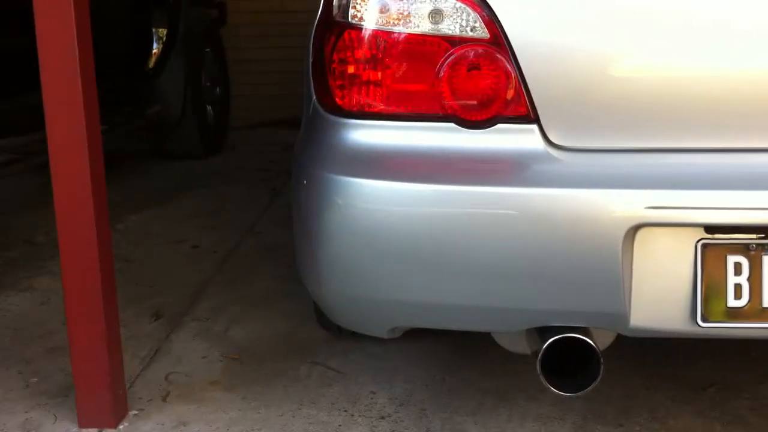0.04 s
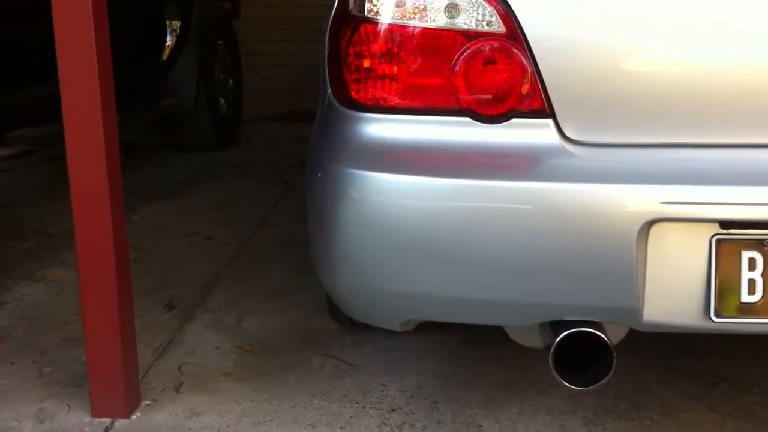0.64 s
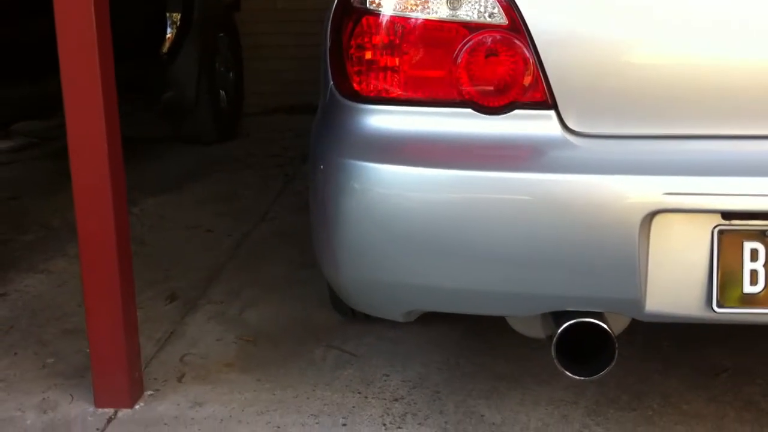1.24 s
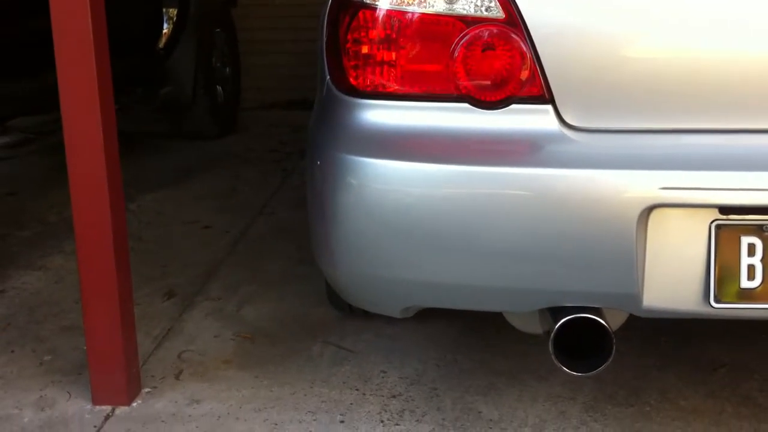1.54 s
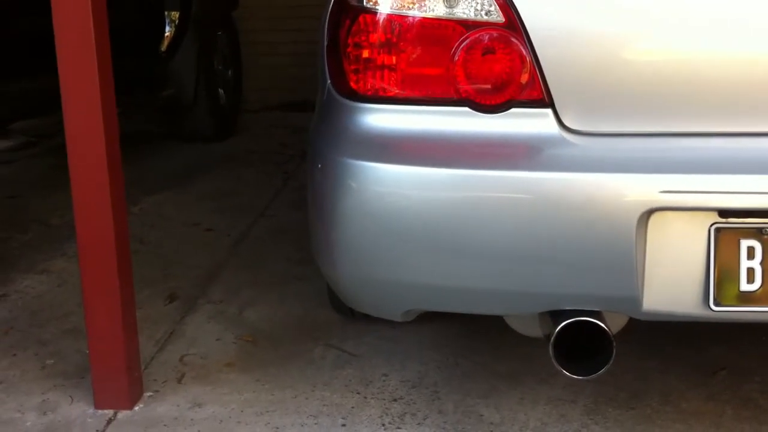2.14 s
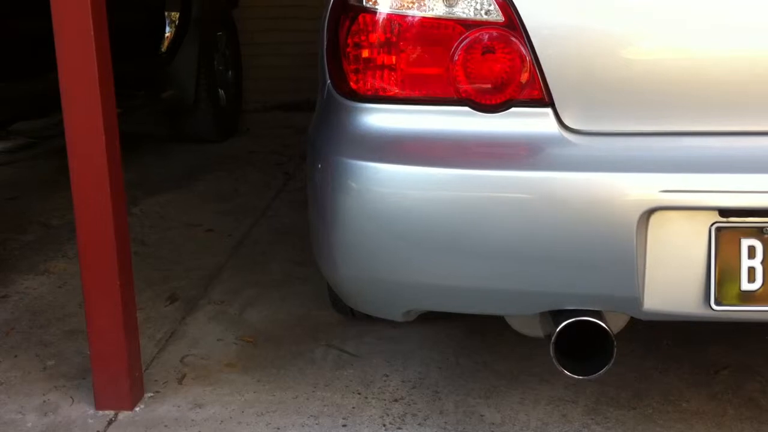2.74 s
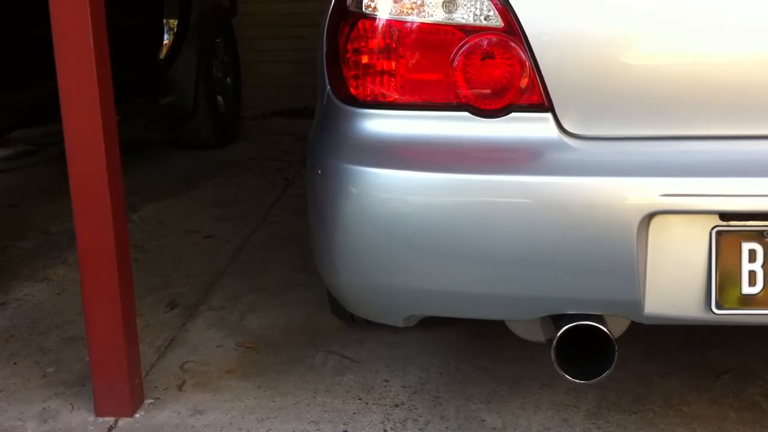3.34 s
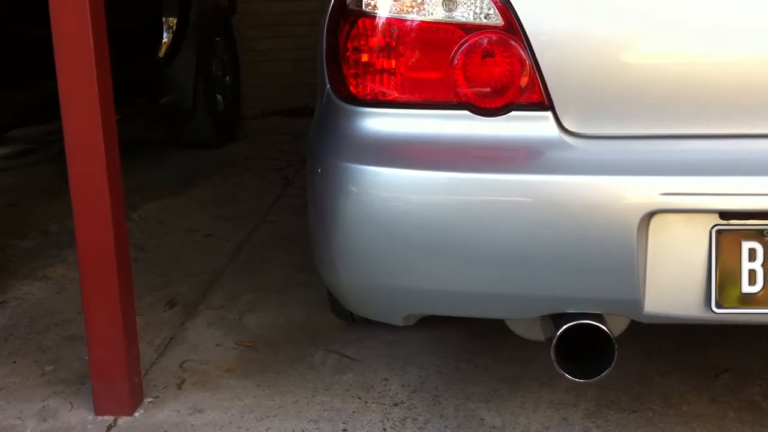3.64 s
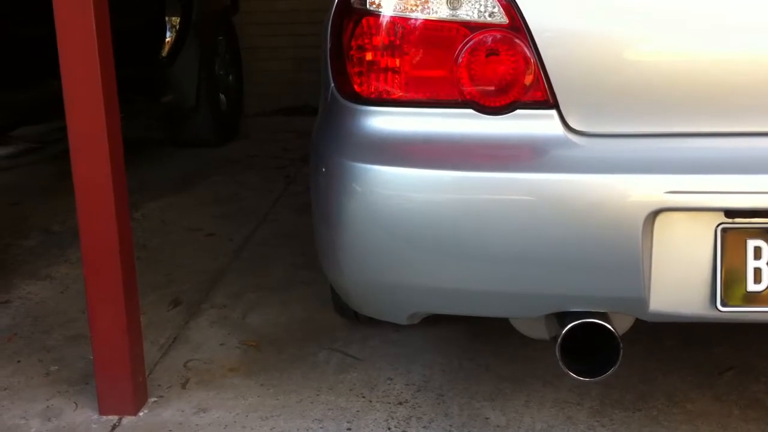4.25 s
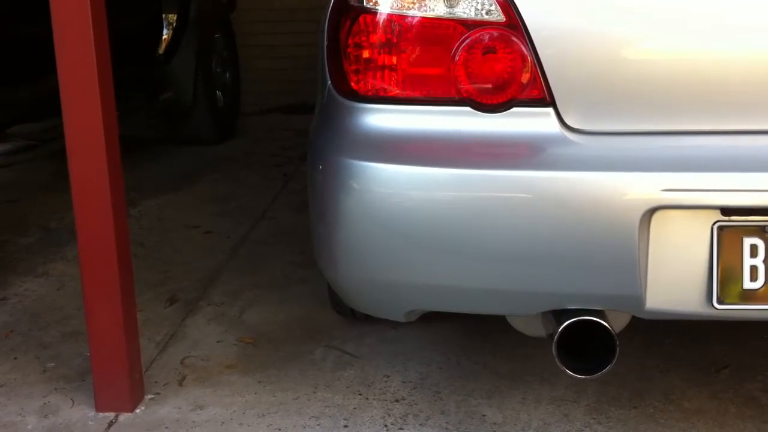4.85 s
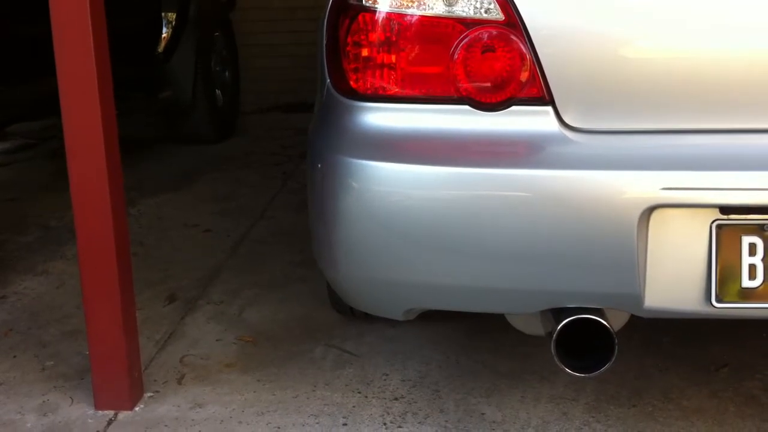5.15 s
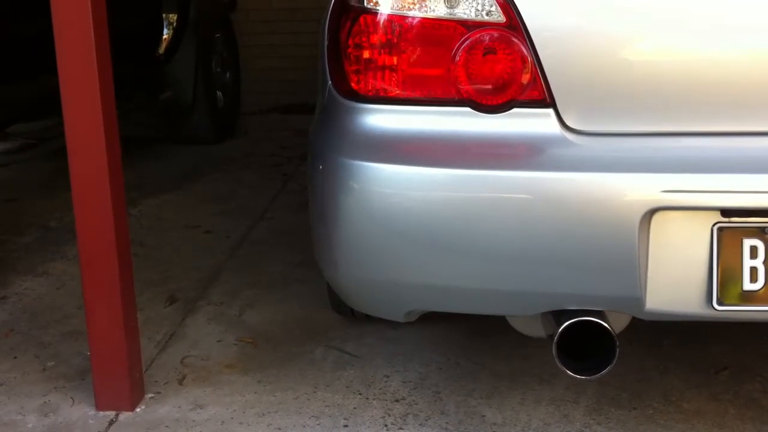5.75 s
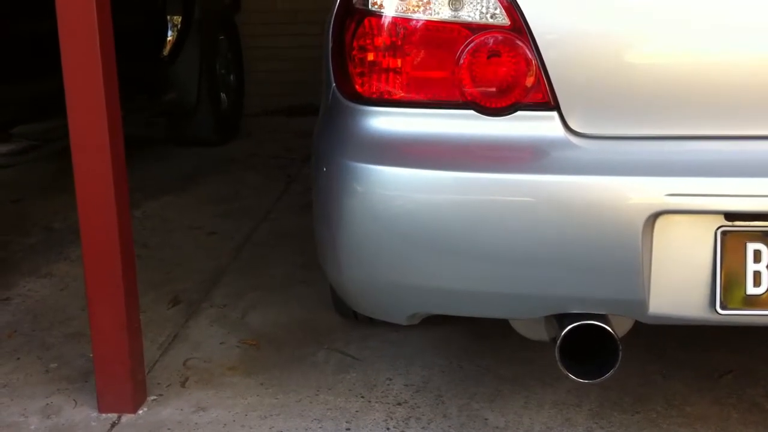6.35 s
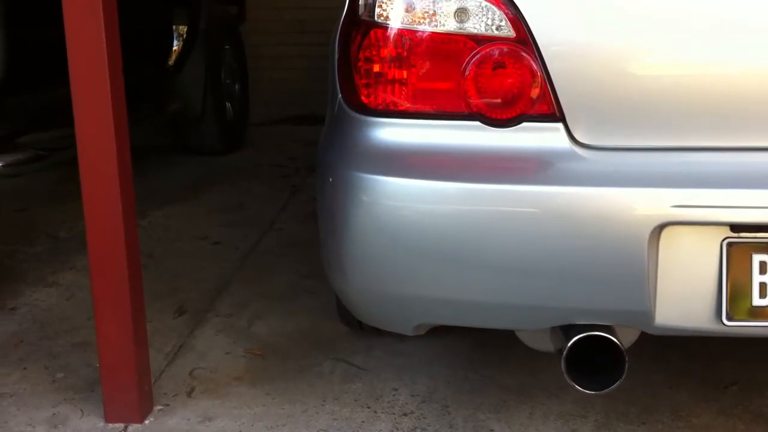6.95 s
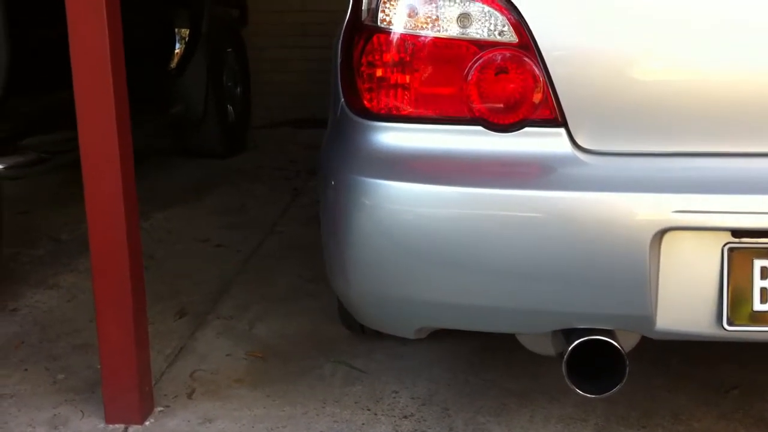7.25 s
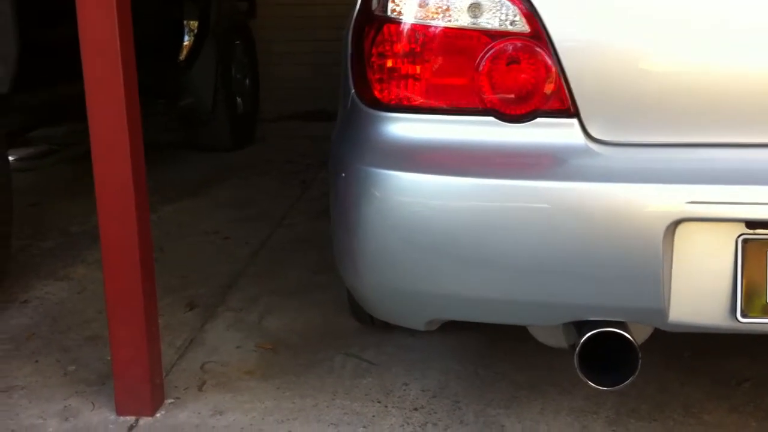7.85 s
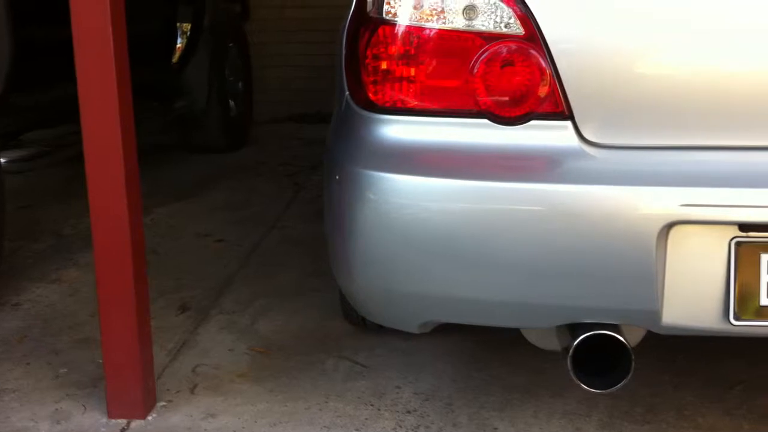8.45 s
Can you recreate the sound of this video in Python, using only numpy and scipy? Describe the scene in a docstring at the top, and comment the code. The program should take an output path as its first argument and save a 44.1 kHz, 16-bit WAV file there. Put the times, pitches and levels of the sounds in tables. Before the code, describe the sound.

A car engine revs twice through a throaty exhaust, holds the second rev, then slowly winds down to a lumpy idle.

```python
"""A throaty blip from a flat-four car, heard close behind its tailpipe in a carport; a second blip and
a long rev follow, then a slow fall to a lumpy idle and a last touch of throttle.
Unequal headers make the firings limp, so half orders boom in the muffler. Gas rasps and hisses out of
the pipe; there are short low thumps and pops, with a ragged flutter as the throttle shuts. The valve
gear sings at high speed and the turbo whistles faintly as it spools down, over a quiet outdoor hush."""
import sys
import numpy as np
from scipy import signal
from scipy.fft import rfft, irfft, next_fast_len
from scipy.io import wavfile
from scipy.ndimage import uniform_filter1d

SR = 44100
rng = np.random.default_rng(int(sys.argv[2]) if len(sys.argv) > 2 else 0)


def waveform_to_disk(signal):
    """Save audio, clipped to [-1, 1], as 16-bit WAV at the path in sys.argv[1]."""
    frames = np.transpose(np.atleast_2d(signal))
    scaled = np.clip(frames, -1, 1) * 32767
    samples = np.round(scaled).astype(np.int16)
    wavfile.write(sys.argv[1], SR, samples)


N = 383229

# engine speed: (time [s], four-stroke cycle rate [Hz]); an order is a multiple of this rate
CYCLE_RATE = [(0.0, 25.0), (0.392, 38.68), (0.515, 38.52), (1.117, 29.93), (1.308, 28.06), (1.644, 37.02),
              (1.982, 48.1), (2.174, 49.6), (2.579, 43.06), (2.828, 43.98), (3.505, 50.12), (4.047, 53.47),
              (4.288, 52.52), (4.5, 48.2), (4.82, 43.4), (5.24, 36.4), (6.2, 24.15), (7.217, 13.37),
              (8.335, 10.78), (8.69, 12.16)]
# the driver's foot: (time [s], throttle [0-1])
THROTTLE = [(0, .75), (.35, 1), (.48, .05), (1.28, .02), (1.44, .85), (1.9, .92), (2.06, .5), (2.2, .1),
            (2.4, 0), (2.57, 0), (2.64, .5), (3.92, .38), (4.12, .1), (4.4, .1), (4.42, 0), (8.54, 0),
            (8.69, .45)]
# one limping cycle of firings: (place in the cycle [0-1], level [dB])
CYLINDERS = [(0, -1.5), (0.252, -2), (0.526, -2), (.775, -1)]
# the firings falter after throttle moves and at idle: (time [s], half-width [s], dip [dB])
FALTERS = [(0.5, 0.055, -5.5), (1.242, 0.028, -2), (2.676, 0.14, -6), (4.448, 0.03, -14), (6.16, 0.097, 0),
           (7.21, 0.053, -3), (8.256, 0.01, -7), (8.37, .025, -5)]
# low thumps and pops: (time [s], half-width [s], level [dB], roughness added to the firings [0-1])
THUMPS = [(.01, 0.049, -13.5, 0), (0.294, .036, -26, 0.11), (0.48, 0.072, -27, 0.48),
          (1.535, 0.16, -22, 0.11), (2.255, 0.025, -16, 0.06), (2.37, 0.058, -25, 0),
          (2.52, 0.032, -16.5, 0), (3.302, 0.11, -38, 0.02), (4.383, 0.061, -15, 0.8)]
# the low boom by throttle position: (order, level shut [dB], half open [dB], wide open [dB])
DEEP_NOTES = [(3, -13, -29, -26.5), (4, -16.5, -17, -15), (5, -18.5, -17, -13.5), (6, -32, -22, -27),
              (7, -21, -18.5, -18), (8, -24, -23, -10), (9, -33, -24, -19)]
# standing waves of the whole exhaust, swept by each deep note: (frequency [Hz], gain [dB])
STANDING_WAVES = [(50, -55), (72, -26.5), (90, -15), (112, -5), (124, -8), (135, 2), (149, -2), (162, -1.5),
                  (174, -1.5), (187, -8.5), (205, -12), (228, -4.5), (266, -14.5), (300, -5.5),
                  (330, -12.5), (380, -9.5), (480, -30.5)]
# orders the headers favour, by throttle position: (order, level shut [dB], wide open [dB])
HEADER_ORDERS = [(10, -1.5, -9.5), (11, 0, -8), (12, 4.5, -3), (13, 0, 4.5), (14, -3, -13.5), (15, 3, -5),
                 (16, -0.5, 3), (17, -9.5, -4.5), (18, -1, -3.5), (19, -4, -9), (20, 0, -2), (21, -7, 0),
                 (22, -43, -9), (24, -4, -9), (26, -9, -0.5), (40, -17, 6.5), (72, -12, -4)]
# the valve gear's singing partials: (order, relative level [dB])
VALVE_ORDERS = [(12, -3), (24, -2), (30, -3.5), (32, -6), (35, -6), (36, -4.5), (39, -3.5), (42, -8),
                (45, -8)]
# resonances that give the car its voice: (frequency [Hz], width [Hz], gain [dB])
MUFFLER_MODES = [(135.8, 14.3, 28), (88, 56, -2.5), (194, 50, -41)]
PIPE_SHUT_MODES = [(213.4, 44, 4.5), (374, 84, 1.5), (593, 20, -2.5), (680, 160, -13), (970, 130, -56)]  # throttle shut
PIPE_OPEN_MODES = [(270, 44, 1.5), (322.6, 52, 7), (429, 83, -0.5), (583, 52, 2.5), (765, 55, -7),
                   (950, 220, -13)]  # throttle wide open
TIP_MODES = [(577, 78, 10), (715, 14, 6.5)]
HOWL_MODES = [(845, 24, -28), (903, 10, -18), (968, 45, -21.5)]
# tone colours of the noise layers: (frequency [Hz], relative level [dB])
RASP_COLOUR = [(40, -38), (120, -36), (250, 3), (480, 1.5), (600, 3), (780, 2), (930, 2), (1250, 3),
               (1600, 0.5), (2150, 0), (2700, -7), (3500, -8.5), (5000, -21.5), (7000, -26)]
HISS_COLOUR = [(1500, -42), (3200, 4), (5000, 2.5), (6000, -2), (8000, -3.5), (11000, -6), (14000, -7.5),
               (16000, -16)]
THUMP_COLOUR = [(20, -45), (60, -29), (100, -14), (150, 3), (300, -14), (450, -12), (800, -73), (2000, -75)]
YARD_COLOUR = [(20, -14), (50, 23), (200, -70), (1000, 13), (5000, -11), (16000, -27)]
# how each layer's fader rides the engine:
# (level coasting at REV_HZ [dB], per doubling of speed [dB], for full load [dB], per unit of boost [dB])
BARK_LAW = (-25.5, 5.5, 8.5, -5.5)
DRONE_LAW = (-10, 7, 34, 2)
RASP_LAW = (-23.5, 10, 0.5, 2.5)
HISS_LAW = (-33.5, 9, 1, 4.5)
VALVE_LAW = (-28.5, 14.5, 2.5, 3)
TIP_LAW = (-34, 5, 10.5, -12)
# the turbocharger spooling down: (time [s], pitch [Hz], level [dB])
TURBO_WHISTLE = [(4.9, 9200, -69), (5.5, 7800, -45.5), (6.2, 5800, -76), (6.9, 4800, -58),
                 (7.15, 4560, -60), (7.7, 3700, -82)]
# faint electric whine at idle: (time [s], level [dB])
WHINE_LEVEL = [(6.9, -95), (7.3, -70), (8.4, -70), (8.69, -80)]

REV_HZ = 50  # cycle rate of a high rev, the reference for the levels
SPOOL_THROTTLE = .1  # opening that fully spools the turbo


def firings(cycles, rough, orders, levels_db):
    """The limping pulse train, built from the given orders; every firing has its own strength."""
    place, db = np.transpose(CYLINDERS)
    limp = np.angle(np.exp(-2j * np.pi * np.outer(orders, place)) @ amp(db))
    grid = np.linspace(0, 1, 2049)
    one_cycle = amp(levels_db) @ np.cos(2 * np.pi * np.outer(orders, grid) + limp[:, None])
    strength = np.interp(cycles * len(place), np.arange(4096), rng.standard_normal(4096))
    return unit(np.interp(cycles % 1, grid, one_cycle) * (1 + rough * strength))


def exhaust_boom(cycles, speed, throttle, rough, drift_db=2, idle_db=-5):
    """Low orders boom as they cross standing waves, and flutter when combustion is uneven."""
    flutter = .81 * rough
    # the second order clears the outlet only at high speed
    boom = amp(-44) * (speed / REV_HZ) ** 8 * np.cos(2 * np.pi * 2 * cycles)
    for multiple, *by_throttle_db in DEEP_NOTES:
        order = round(multiple)
        db = np.interp(throttle, [0, .5, 1], by_throttle_db)
        db += along(STANDING_WAVES, order * speed) + drift_db * wobble(9)
        dispersion = np.pi / 4 * order ** 2  # the muffler smears the pulse
        phase = 2 * np.pi * order * cycles + dispersion + flutter * wobble(50)
        boom += amp(db) * (1 + flutter * wobble(50)) * np.cos(phase)
    return np.sqrt(2) * amp(idle_db * idling(speed)) * boom


def exhaust_bark(cycles, speed, throttle, rough, surge_db=1.72, lump_db=1.5):
    """Pulses ring the pipe, brighter on open throttle; at idle they set the muffler droning in lumps."""
    orders = np.arange(10, 71)
    multiple, shut_db, open_db = np.transpose(HEADER_ORDERS)
    coasting = carport(firings(cycles, rough, orders, np.interp(orders, np.round(multiple), shut_db)))
    pulling = carport(firings(cycles, rough, orders, np.interp(orders, np.round(multiple), open_db)))
    dark = steady(ring(coasting, PIPE_SHUT_MODES, low_hz=156))
    bright = steady(ring(pulling, PIPE_OPEN_MODES, low_hz=159))
    bark = steady((1 - throttle) * dark + throttle * bright) * amp(surge_db * wobble(12))
    muffler = steady(ring(coasting, MUFFLER_MODES, low_hz=79.5))
    drone = idling(speed) * muffler * amp(lump_db * wobble(20))
    return fader(BARK_LAW, speed, throttle) * bark + fader(DRONE_LAW, speed, throttle) * drone


def gas_rush(cycles, speed, throttle, rough, repeat_share=.42, rasp_depth=.14, hiss_depth=.008):
    """Each firing pushes out a puff of turbulent gas; part of its rasp repeats from cycle to cycle."""
    puffs = firings(cycles, rough, orders=[1, 3, 4, 5], levels_db=[-5, -3, 0, -4])
    grid = np.linspace(0, 1, 1024)
    loops = sum(wobble(6) * np.interp(cycles % 1, grid, rng.standard_normal(1024)) for _ in range(4))
    buzz = steady(coloured(loops, RASP_COLOUR))
    grit = np.sqrt(repeat_share) * buzz + np.sqrt(1 - repeat_share) * noise(RASP_COLOUR)
    rasp = grit * unit(np.exp(rasp_depth * puffs))
    hiss = noise(HISS_COLOUR) * unit(np.exp(hiss_depth * puffs))
    return fader(RASP_LAW, speed, throttle) * rasp + fader(HISS_LAW, speed, throttle) * hiss


def valve_gear(cycles, speed, throttle, waver_db=2, howl_order=18):
    """High orders sing at speed, swelling and breaking up; a steadier one howls through resonances."""
    def partial(order, flicker_db=2.2):
        """One order, flickering in level and smeared in phase."""
        flicker = amp(flicker_db * wobble(22))
        return unit(flicker * np.sin(2 * np.pi * round(order) * cycles + .3 * wobble(30)))

    song = sum(amp(db + waver_db * wobble(4.3)) * partial(order) for order, db in VALVE_ORDERS)
    howl = np.abs(resonance(HOWL_MODES, howl_order * speed)) * partial(howl_order, flicker_db=1.2)
    duck_db = np.interp(throttle, [0, SPOOL_THROTTLE], [-7.5, 0])
    return amp(duck_db) * howl + fader(VALVE_LAW, speed, throttle) * unit(song)


def tailpipe_tip(speed, throttle, swell_db=2):
    """Flow across the tip rings its hollow modes, which stand out most at idle."""
    hollow = unit(ring(rng.standard_normal(N), TIP_MODES, low_hz=457))
    return fader(TIP_LAW, speed, throttle) * amp(swell_db * wobble(14)) * hollow


def thumps():
    """Short low thumps and pops: brief swells of dark noise."""
    return noise(THUMP_COLOUR) * sum(amp(db) * swell(s, width) for s, width, db, _ in THUMPS)


def turbo(half_band_hz=450):
    """An airy whistle, a narrow band of noise, sinks as the turbine slows."""
    hz, db = curves(TURBO_WHISTLE)
    phase = 2 * np.pi * np.cumsum(hz) / SR
    whistle = wobble(2 * half_band_hz) * np.cos(phase) + wobble(2 * half_band_hz) * np.sin(phase)
    return amp(db) * unit(whistle)


def carport(x, wet_db=-11, t60=.12, predelay_s=.004):
    """Floor, wall and roof scatter the pulses into a short tail."""
    t = np.arange(SR // 4) / SR
    tail = rng.standard_normal(len(t)) * amp(-60 * t / t60) * (t > predelay_s)
    return x + amp(wet_db) * signal.fftconvolve(x, tail / np.linalg.norm(tail))[:N]


def background(yard_db=-54, whine_hz=12075):
    """A bed of outdoor hush and a thin, shimmering electric whine."""
    phase = 2 * np.pi * whine_hz * np.arange(N) / SR + .5 * wobble(12)
    whine = np.sqrt(2) * np.sin(phase) * unit(amp(3 * wobble(7)))
    return amp(yard_db) * noise(YARD_COLOUR) + amp(curves(WHINE_LEVEL)[0]) * whine


def fader(law, speed, throttle):
    """A layer's gain follows speed, load, and the boost that needs both speed and an open throttle."""
    rev_db, doubling_db, load_db, boost_db = law
    revs = speed / REV_HZ
    boost = np.minimum(throttle / SPOOL_THROTTLE, 1) * revs ** 10
    return amp(rev_db + doubling_db * np.log2(revs) + load_db * throttle ** 2 + boost_db * boost)


def idling(speed):
    """0 at speed, 1 once the engine has sunk to its idle."""
    return np.clip((17 - speed) / 3.5, 0, 1)


def ring(x, modes, low_hz):
    """x through pipe resonances; the small outlet radiates little below low_hz."""
    f = np.geomspace(1, SR / 2, 4096)
    response = resonance(modes, f) * f ** 4 / (f ** 4 + low_hz ** 4)
    return filtered(x, lambda hz: np.interp(hz, f, response))


def resonance(modes, f):
    """Complex response at f of modes that alternate in polarity."""
    return sum((-1) ** k * amp(db) * 1j * f * width / (hz * hz - f * f + 1j * f * width)
               for k, (hz, width, db) in enumerate(modes))


def noise(colour):
    """Coloured noise of rms 1."""
    return unit(coloured(rng.standard_normal(N), colour))


def coloured(x, colour):
    """x through an EQ curve."""
    return filtered(x, lambda hz: amp(along(colour, hz)))


def filtered(x, response):
    """x filtered by a complex response of frequency."""
    size = next_fast_len(N + SR // 2)
    return irfft(rfft(x, size) * response(np.fft.rfftfreq(size, 1 / SR)), size)[:N]


def along(points, hz):
    """(frequency [Hz], level [dB]) points read on a log axis."""
    f, db = np.transpose(points)
    return np.interp(np.log(hz + 1), np.log(f), db)


def curves(rows):
    """Automation: one value per sample for each column after the time."""
    times, *columns = np.transpose(rows)
    return [np.interp(np.arange(N) / SR, times, column) for column in columns]


def swell(s, half_width):
    """A bell-shaped envelope around time s."""
    t = s + half_width * np.linspace(-5, 5, 101)
    return np.interp(np.arange(N) / SR, t, np.exp(-.5 * ((t - s) / half_width) ** 2))


def wobble(rate):
    """A smooth random curve, about rate knots a second."""
    step = max(round(SR / rate / 16), 1)
    points = signal.resample_poly(rng.standard_normal(N // (step * 16) + 4), 16, 1)
    return (points[:-1, None] + np.diff(points)[:, None] * (np.arange(step) / step)).ravel()[:N]


def steady(x):
    """Level to a running rms of 1, leaving single beats intact."""
    power = uniform_filter1d(uniform_filter1d(x ** 2, size=SR // 9), size=SR // 12)
    return x / np.sqrt(np.abs(power) + 1e-12)


def unit(x):
    """Scale to rms 1."""
    return x / np.sqrt(np.mean(x ** 2) + 1e-20)


def amp(db):
    """Decibels to gain."""
    return np.exp(np.asarray(db) * (np.log(10) / 20))


def scene(flywheel_s=.11):
    """One crankshaft and one throttle drive the engine; the flywheel rounds off each change of speed."""
    speed = uniform_filter1d(curves(CYCLE_RATE)[0], size=round(flywheel_s * SR), mode="nearest")
    throttle = np.clip(curves(THROTTLE)[0], 0, 1)
    stumble = sum(added * swell(s, width) for s, width, _, added in THUMPS)
    rough = .05 + .06 * throttle + .1 * idling(speed) + stumble  # unevenness of the firings
    cycles = np.cumsum(speed) / SR + .012 * rough * wobble(60)  # the crank hurries and lags
    falter = amp(sum(db * swell(s, width) for s, width, db in FALTERS))
    engine = cycles, speed, throttle, rough
    exhaust = falter * (exhaust_boom(*engine) + exhaust_bark(*engine)) + gas_rush(*engine)
    detail = valve_gear(cycles, speed, throttle) + tailpipe_tip(speed, throttle) + turbo() + thumps()
    return (exhaust + detail + background())[None]


def record(dry, ceiling=.78, top_hz=16000):
    """The microphone rounds off the highest peaks; everything above top_hz is cut."""
    rounded = dry[0] / (1 + np.abs(dry[0] / ceiling) ** 6) ** (1 / 6)
    return filtered(rounded, lambda hz: hz < top_hz)[None]


dry = scene()
out = record(dry)
waveform_to_disk(out)
```